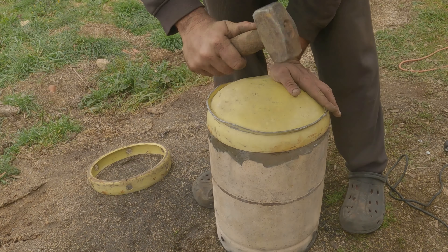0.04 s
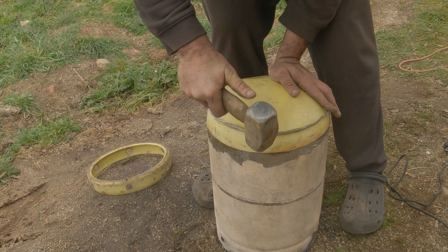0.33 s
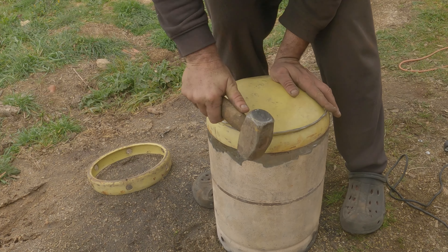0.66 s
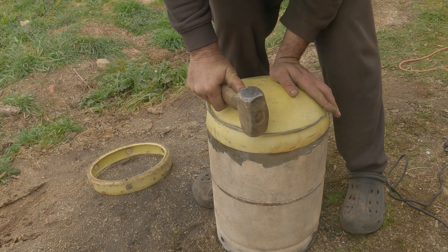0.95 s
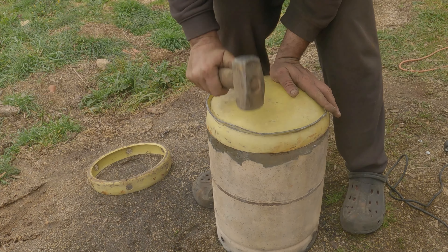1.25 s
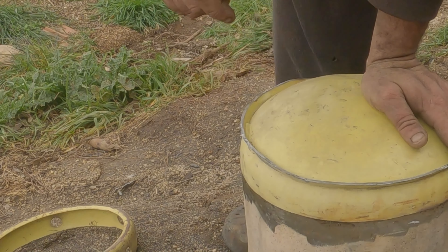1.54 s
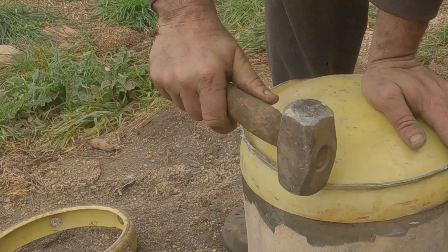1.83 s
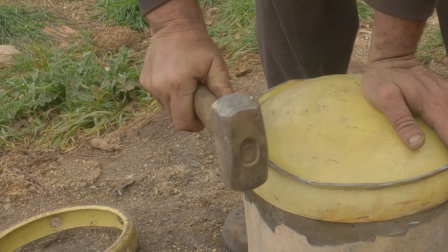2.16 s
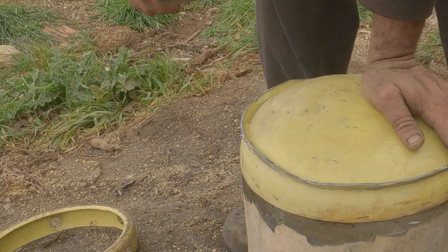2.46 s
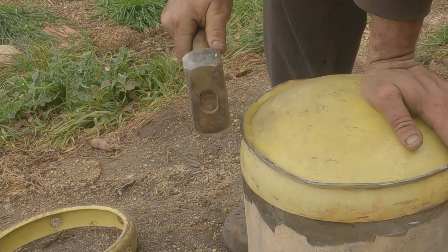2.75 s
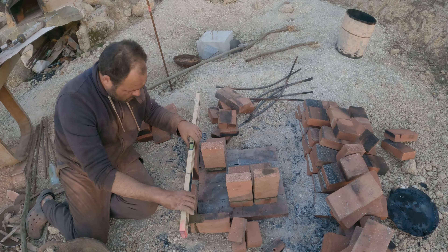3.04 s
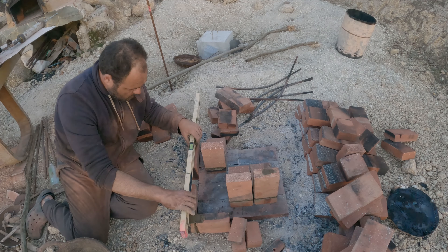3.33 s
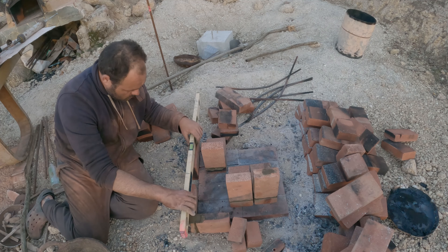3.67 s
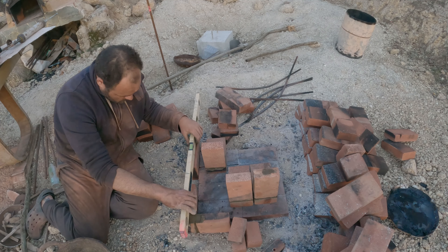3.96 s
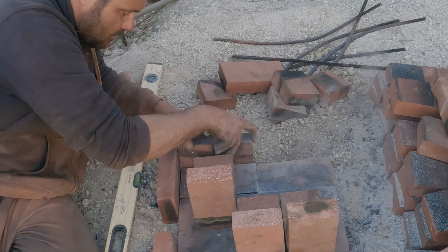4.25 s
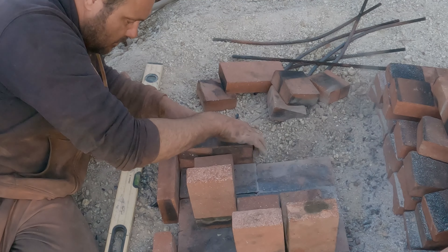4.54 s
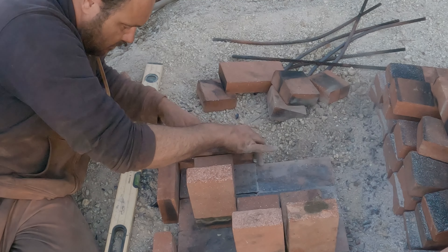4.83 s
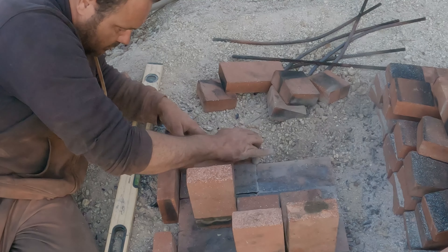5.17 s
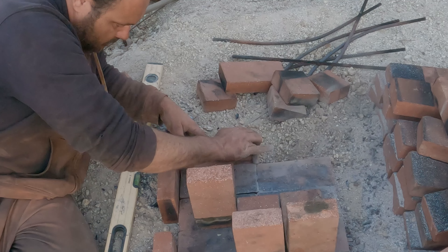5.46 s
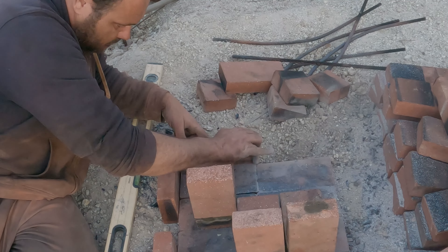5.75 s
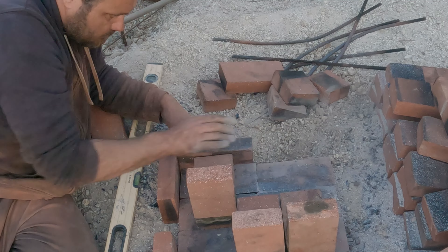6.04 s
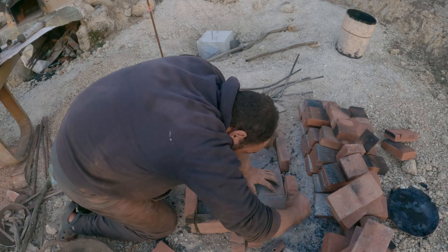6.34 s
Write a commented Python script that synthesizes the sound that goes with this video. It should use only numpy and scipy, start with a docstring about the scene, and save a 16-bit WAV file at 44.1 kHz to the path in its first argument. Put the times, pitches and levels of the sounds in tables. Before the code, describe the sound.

Close outdoor hammer blows ring on a steel gas cylinder, then bricks are quietly knocked down and slid over grit.

```python
"""A clangy steel ring, outdoors and close to the microphone: a lump hammer beats on the domed end of a gas
cylinder steadied by hand. Each blow is a crack of steel on steel, a hollow thud into the soil and the long
ring of the shell; a limiter ducks under the blow, so the ring swells back after it. At 3 s the scene
jumps to quiet bricklaying on an open site: dry bricks are nudged, set down with a knock and slid over
one another on grit, while sleeves rustle in the faint air."""
import sys
import numpy as np
from scipy import signal
from scipy.fft import rfft, irfft, next_fast_len
from scipy.io import wavfile
from scipy.ndimage import uniform_filter1d, minimum_filter1d

SR = 44100
rng = np.random.default_rng(int(sys.argv[2]) if len(sys.argv) > 2 else 0)


def inscribe(sig):
    """Save sig as 16-bit PCM at rate SR to the path in sys.argv[1].

    A 1-D sig is mono; a 2-D sig holds one channel per row.
    Samples are clipped to [-1, 1] before scaling.
    """
    pcm = np.round(np.clip(np.atleast_2d(sig).T, -1, 1) * 32767)
    wavfile.write(sys.argv[1], SR, pcm.astype(np.int16))


N = 286650
TIME = np.arange(N) / SR
RING_DROP_S, SCENE_JUMP_S = 1.323, 2.992

# hammer blows: t/s, struck spot, ring level/dB, brightness/(dB per octave), weight/dB, hardness/dB
BLOWS = [(-0.125, "crown", -0.5, 0, -5.5, 5.5), (0.2945, "crown", -0.5, -1, -8.5, 1.5),
         (0.7340, "shoulder", 1.5, 0, 6.5, -2.5), (1.0867, "shoulder", -0.5, 1, 2, 1),
         (1.4055, "rim", -4.5, 0, -10, 1), (1.8513, "rim", 3.5, -2.5, 1, -0.5),
         (2.2793, "rim", 1.5, -1, 0.5, 3), (2.7590, "side", 2, 1.5, 9.5, 8.5)]
# where the hammer lands: crown, shoulder, rim, side
SPOTS = ["crown", "shoulder", "rim", "side"]
# modes of the steel shell: f/Hz, t60/s, then level/dB for each of the SPOTS
SHELL_MODES = [(720, 1.1, -37, -34, -44, -45), (767, 1.4, -43, -34, -70, -70),
               (798, 1.3, -34, -40, -70, -42), (828, 1.4, -70, -70, -34, -46), (859, 2, -51, -51, -48, -41),
               (944, 1.8, -31, -33, -70, -34), (951, 1.8, -38, -29, -60, -33),
               (961, 1.8, -53, -42, -37, -41), (970, 1.8, -35, -38, -36, -37),
               (980, 1.5, -36, -36, -63, -58), (1178, 1.2, -41, -35, -37, -41),
               (1283, 0.9, -51, -46, -47, -38), (1311, 2, -45, -42, -70, -51),
               (1425, 1.2, -42, -29, -70, -70), (1612, 1.2, -34, -33, -66, -63),
               (1690, 0.9, -40, -46, -37, -37), (1711, 1.3, -27, -33, -70, -61),
               (1727, 1.2, -70, -46, -33, -70), (1811, 1.2, -51, -48, -36, -43),
               (1821, 1.5, -34, -42, -68, -38), (1834, 1.6, -70, -52, -31, -38),
               (1891, 0.8, -45, -40, -53, -49), (2104, 0.9, -58, -47, -47, -37),
               (2179, 0.8, -37, -40, -42, -29), (2270, 0.7, -58, -48, -58, -34),
               (2478, 0.55, -39, -41, -36, -39), (2610, 0.7, -37, -35, -27, -45),
               (3008, 0.5, -34, -36, -55, -57), (3243, 0.55, -33, -46, -42, -34),
               (3298, 0.6, -50, -49, -30, -54), (3525, 0.55, -35, -48, -47, -43),
               (3737, 0.55, -35, -48, -40, -48)]
# modes of the hollow vessel standing on soil: f/Hz, level/dB, t60/s
THUD_MODES = [(89.6, -51.5, 1.2), (100.6, -27, 0.2), (140, -16.5, 0.044), (185, -25.5, 0.066),
              (246, -15, .10), (289, -12, 0.069), (379.4, -13, 0.044), (450, -22, 0.18)]
# spectra around the cylinder: f/Hz, relative level/dB
SHIMMER = [(2000, -9.5), (2500, 2.5), (3300, 11), (4500, -0.5), (7000, -9), (8500, -25), (12000, -24)]   # the shell's crowded high modes
CLANK = [(400, -33), (620, -11), (850, -1.5), (1300, -6), (1700, -9), (2600, -24)]   # middle of the steel contact
CRACK = [(900, -24), (1600, -8), (2600, 0), (4200, -4.5), (5500, -9.5), (8000, -34.5)]   # its hard edge
FIZZ = [(3000, -23.5), (4800, 3), (7000, 1.5), (8600, -15), (12000, -20), (16000, -23)]   # its top
YARD = [(40, -19.5), (120, 2.5), (300, -4), (560, -6.5), (900, -0.5), (1600, -5), (3000, -0.5),
        (5000, -1.5), (7000, -8.5), (8700, -24.5), (11000, -29), (16000, -51)]   # scatter from the ground and nearby things
YARD_AIR = [(30, -14), (90, 0), (200, -2), (500, -3), (1500, -9), (4000, -22), (7000, -31), (9000, -42),
            (16000, -52)]   # low outdoor background
# the cylinder rocks back onto the soil: t/s, level/dB
ROCKING = [(1.937, -28.5)]

# small nudges of a brick against the spirit level: t/s, length/s, level/dB
NUDGES = [(2.989, 0.028, -49), (3.038, .05, -50.5), (3.175, .09, -55), (3.384, 0.057, -59),
          (3.509, 0.033, -58), (3.596, 0.129, -63), (4.018, 0.058, -55)]
# ways a brick makes contact: nudge, set, slide, push
CONTACTS = ["nudge", "set", "slide", "push"]
# modes of a brick: f/Hz, width/Hz, then level/dB for each of the CONTACTS
BRICK_MODES = [(1939, 17.7, -27, 9.5, -21, -34.5), (1994, 11, -25, -1, -1.5, -11),
               (2390, 23, 9, 5.5, 6.5, 5), (3480, 28, -12, -2.5, -11.5, -2), (4420, 44, -27, -2, 0.5, -21),
               (4847, 60, -10.5, -5, -4, 7), (5530, 220, -0.5, -21, -23, -10.5),
               (6430, 340, -6, -2, -1.5, -7.5), (7100, 42, -19, -1, -2.5, -14),
               (9850, 510, -23, -9.5, -11.5, -14)]
# spectra on the building site: f/Hz, relative level/dB
GRIT = [(500, -29), (1200, 5.5), (2500, 13.5), (3600, -4.5), (4500, -8), (7200, 9.5), (8200, 5),
        (9000, -24), (10500, -7), (13000, -15), (16000, -28)]   # sand between brick faces
RUMBLE = [(40, -35), (130, -42), (250, -6.5), (360, 5.5), (600, -3), (1100, -12), (2200, -9)]   # the stack under a sliding brick
SITE_AIR = [(40, -35), (100, -18.5), (170, -6.5), (280, -7.5), (520, 2), (900, -2.5), (2300, -8.5),
            (4000, -14.5), (7000, -22.5), (8800, -41.5), (10500, -35), (16000, -45)]   # outdoor background
CLOTH = [(100, -12), (220, -5), (600, -0.5), (1300, -3.5), (2400, 0), (3500, -8), (6500, -15.5),
         (8800, -37), (10500, -29), (16000, -59)]   # rubbing sleeves
# a brick slides over the stack: t/s, length/s, level/dB, weight on the bed/dB, contact
STROKES = [(4.285, 0.19, -49, 8, "set"), (4.488, 0.12, -57, -29, "slide"),
           (4.575, 0.18, -51.5, -1.5, "slide"), (4.736, .19, -50.5, 4.5, "slide"),
           (4.956, 0.138, -60, -20.5, "slide"), (5.268, 0.157, -58.5, 4.5, "set"),
           (6.348, 0.058, -46.5, 0, "push"), (6.385, 0.19, -38.5, -10.5, "push")]
# a brick grinds into its seat at the end of a stroke: middle t/s, level/dB
SEATINGS = [(4.88, -55), (5.399, -55), (6.464, -51)]
# the arms reach and draw back: middle t/s, half length/s, level/dB
ARM_MOVES = [(3.2, 0.42, -69), (4.55, 0.28, -71), (5.256, 0.42, -67), (6.026, 0.1, -60), (6.45, 0.15, -57)]
# brick knocks: t/s, level/dB, clack f/Hz (lower is softer), contact
KNOCKS = [(4.2874, -19.5, 1210, "set"), (4.3287, -12, 914, "set"), (4.8700, -34, 635, "slide"),
          (5.6000, -36.5, 1930, "set"), (5.7110, -37.5, 629.3, "set"), (6.3270, -28, 2700, "nudge")]
# modes of the stack under a knock: f/Hz, level/dB, t60/s
STACK_MODES = [(354.6, -21, 0.28), (601, -19, 0.06), (780, -11, 0.019), (1100, -21, 0.016)]
# dull bumps of a brick on its bed: t/s, level/dB, f/Hz
BUMPS = [(5.393, -50.5, 172), (5.712, -57.5, 214), (6.293, -57, 120), (6.423, -43.5, 200),
         (6.461, -43, 139)]


def from_db(db):
    """Decibels to gain."""
    return 10 ** (np.asarray(db) / 20)


def rms_one(x):
    """Scale to an rms of 1."""
    return x / np.sqrt(np.mean(x ** 2) + 1e-20)


def at_hz(points, hz):
    """Read a spectrum on a log-frequency axis."""
    f, value = np.transpose(points)
    return np.interp(np.log(np.maximum(hz, 1)), np.log(f), value)


def coloured(x, spectrum):
    """Give a steady signal a spectrum that falls away outside its ends; rms 1."""
    size = next_fast_len(len(x))
    hz = np.arange(size // 2 + 1) * SR / size
    skirts = np.minimum(hz / spectrum[0][0], 1) * np.minimum(spectrum[-1][0] / (hz + 1), 1) ** 2
    shaped = rfft(x, size) * from_db(at_hz(spectrum, hz)) * skirts
    return rms_one(irfft(shaped, size)[:len(x)])


def noise(spectrum, size):
    """Coloured noise of rms 1."""
    return coloured(rng.standard_normal(size), spectrum)


def high_pass(x, hz):
    """Roll off the bass."""
    return signal.sosfilt(signal.butter(2, hz, "high", fs=SR, output="sos"), x)


def low_pass(x, hz, order):
    """Roll off the top."""
    return signal.sosfilt(signal.butter(order, hz, fs=SR, output="sos"), x)


def decay(t, t60):
    """A fall of 60 dB in t60 seconds."""
    return np.exp(-np.log(1000) * t / t60)


def click(t):
    """A unit impulse at t = 0."""
    return 1. * (t == 0)


def ring(x, hz, t60):
    """One mode: a unit click sets a sine of height 1 ringing."""
    radius, angle = decay(1 / SR, t60), 2 * np.pi * hz / SR
    return signal.lfilter([0, np.sin(angle)], [1, -2 * radius * np.cos(angle), radius ** 2], x + 1e-18)


def flutter(t, per_s, depth_db):
    """A gain that wavers at random."""
    knots = np.arange(0, t[-1] + 1 / per_s, 1 / per_s)
    return from_db(depth_db * np.interp(t, knots, rng.normal(size=len(knots))))


def add(out, s, sound):
    """Mix a sound in from s seconds."""
    at = round(s * SR)
    part = sound[max(-at, 0):N - at]
    out[max(at, 0):max(at, 0) + len(part)] += part


def shell_ring(t, spot, db_per_octave):
    """The cylinder's strong, long modes: the struck spot decides which speak, brightness tilts them."""
    out = 0
    for hz, t60, *levels in SHELL_MODES:
        db = levels[SPOTS.index(spot)] + db_per_octave * np.log2(hz / SHELL_MODES[0][0])
        out += rng.choice([-1, 1]) * from_db(db) * ring(click(t), hz, t60)
    return out


def shimmer(t, t60_at_3k=0.56, chance_db=6.5, count=64):
    """Each blow wakes a different handful of the crowded high modes, shorter the higher they lie."""
    pitches = np.geomspace(2300, 12000, count) * np.exp(.008 * rng.normal(size=count))
    levels = at_hz(SHIMMER, pitches) + chance_db * np.clip(rng.normal(size=count), -2, 1.5)
    gains = rms_one(from_db(levels)) * rng.choice([-1, 1], count) / np.sqrt(count)
    t60s = t60_at_3k * (3000 / pitches) ** 0.1
    return sum(gain * ring(click(t), hz, t60) for gain, hz, t60 in zip(gains, pitches, t60s))


def chatter(t, spectrum, hold_s, t60, attack_s=0.0007):
    """Steel chatters on steel for an instant, then the burst collapses."""
    shape = np.minimum(t / attack_s, 1) * decay(np.maximum(t - hold_s, 0), t60)
    burst = noise(spectrum, len(t)) * shape
    return burst * np.sqrt(np.sum(shape ** 2) / np.sum(burst ** 2))


def thud(t, lag_s=0.0017):
    """The whole vessel is driven into the ground just after the contact."""
    late = np.maximum(t - lag_s, 0)
    return sum(from_db(db) * decay(late, t60) * np.sin(2 * np.pi * hz * late) * (-1) ** (k // 2)
               for k, (hz, db, t60) in enumerate(THUD_MODES))


def yard_scatter(t):
    """The ground and nearby things throw a blow back at the microphone: a splash and a duller tail."""
    splash = from_db(-17) * noise(YARD, len(t)) * decay(t, t60=0.16)
    dull = low_pass(noise(YARD, len(t)), hz=5000, order=2)
    return splash + from_db(-27.5) * dull * decay(t, t60=0.37)


def hammering():
    """Each blow replaces the last ring: heavy ones clank and lose top, hard ones crack and shimmer."""
    out = np.zeros(N)
    ends = [row[0] for row in BLOWS[1:]] + [SCENE_JUMP_S]
    for (s, spot, ring_db, db_per_octave, weight_db, hardness_db), end in zip(BLOWS, ends):
        t = np.arange(round((end - s) * SR)) / SR
        steel = from_db(ring_db) * shell_ring(t, spot, db_per_octave)
        steel += from_db(-29.5 + 0.3 * hardness_db - 0.2 * weight_db) * shimmer(t)
        clank = from_db(-5.5 + weight_db) * chatter(t, CLANK, hold_s=0.00069, t60=0.021)
        crack = from_db(-3.5 + hardness_db) * chatter(t, CRACK, hold_s=0.0017, t60=0.014)
        fizz = from_db(-6.5 - 0.42 * weight_db) * chatter(t, FIZZ, hold_s=0.00033, t60=0.015)
        body = from_db(0.97) * high_pass(thud(t), hz=69.5)
        steel *= flutter(t, per_s=70, depth_db=0.95)
        blow = steel + clank + crack + fizz + body + yard_scatter(t)
        if s < RING_DROP_S < end:   # this ring drops abruptly, 14 dB in 4 ms
            blow *= from_db(-14 * np.clip((s + t - RING_DROP_S) / .004, 0, 1))
        fade_out = np.clip((end - s - t) / .005, 0, 1)
        add(out, s, blow * fade_out)
    return out


def rocking():
    """The cylinder rocks back onto the soil with a soft thud."""
    out, t = np.zeros(N), np.arange(SR // 3) / SR
    for s, db in ROCKING:
        add(out, s, from_db(db) * high_pass(thud(t), hz=120))
    return out


def grains(size, per_s=3000, spread_db=2.5):
    """Two rough faces rubbing: dense clicks of uneven size."""
    heights = from_db(spread_db * np.minimum(rng.exponential(1, size), 4)) * rng.choice([-1, 1], size)
    return rms_one(heights * (rng.random(size) < per_s / SR))


def brick_ring(x, contact):
    """A brick's narrow resonances; how it lies decides their strengths."""
    out = 0
    for hz, width, *levels in BRICK_MODES:
        even_power = 2 * np.sqrt(np.pi * width / SR)
        t60 = np.log(1000) / (np.pi * width)
        out += from_db(levels[CONTACTS.index(contact)]) * even_power * ring(x, hz, t60)
    return out


def rub(length, contact, attack_s, release_s, weight_db):
    """One push: grit hisses, rings the sliding brick and rumbles in the stack beneath."""
    t = np.arange(round(length * SR) + SR // 10) / SR
    push = np.clip(np.minimum(t / attack_s, (length - t) / release_s), 0, 1) ** 0.56
    sand = grains(len(t)) * flutter(t, per_s=90, depth_db=3.5)   # the faces catch and slip
    hiss = from_db(-14) * coloured(sand, GRIT)
    rumble = from_db(-8 + weight_db) * coloured(sand, RUMBLE)
    return (hiss + rumble) * push + from_db(-13.5) * brick_ring(sand * push, contact)


def scrapes(nudge_rise_share=0.338, seating_s=0.05):
    """Brick on brick: nudges swell and fade at once, strokes run longer, seatings are short and heavy."""
    out = np.zeros(N)
    for s, length, db in NUDGES:
        rise_s = nudge_rise_share * length
        nudge = rub(length, "nudge", rise_s, length - rise_s, weight_db=-9.5)
        add(out, s, from_db(db) * nudge)
    for s, length, db, weight_db, contact in STROKES:
        stroke = rub(length, contact, attack_s=0.029, release_s=0.11, weight_db=weight_db)
        add(out, s, from_db(db) * stroke)
    half_s = seating_s / 2
    for s, db in SEATINGS:
        seating = rub(seating_s, "slide", half_s, half_s, weight_db=15)
        add(out, s - half_s, from_db(db) * seating)
    return high_pass(out, hz=134)


def sleeves(t):
    """Cloth rubs on cloth, swelling with each move of the arms."""
    swell = sum(from_db(db) * np.exp(-((t - s) / half_s) ** 2 / 2) for s, half_s, db in ARM_MOVES)
    return swell * coloured(grains(len(t)), CLOTH)


def with_bounces(rows, above_db=-17, first_gap_s=0.0153):
    """Every knock; a loud one bounces twice, each time sooner, weaker and softer."""
    for s, db, clack_hz, contact in rows:
        yield s, db, clack_hz, contact
        if db > above_db:
            for k in range(2):
                s += first_gap_s * 0.4 ** k
                db -= 8.5
                clack_hz *= 0.85
                yield s, db, clack_hz, contact


def knocks():
    """One dull swing of pressure and a splash of grit as a brick lands; stack and brick ring on."""
    out, t = np.zeros(N), np.arange(SR // 4) / SR
    tap = click(t)
    for s, db, clack_hz, contact in with_bounces(KNOCKS):
        clack = 0.62 * ring(tap, clack_hz, t60=7.4 / clack_hz)
        weight = min(900 / clack_hz, 1) ** 2   # light, hard taps hardly move the stack
        stack = weight * sum(from_db(level) * ring(tap, hz, t60) for hz, level, t60 in STACK_MODES)
        splash = from_db(-21) * noise(GRIT, len(t)) * decay(t, t60=0.0088)
        knock = clack + stack + splash + from_db(-11) * brick_ring(tap, contact)
        pole = np.exp(-2 * np.pi * (2500 + clack_hz) / SR)   # low-pass: sand cushions the contact
        cushioned = signal.lfilter([1 - pole], [1, -pole], knock)
        add(out, s, from_db(db) * high_pass(cushioned, hz=260))
    return out


def bumps():
    """A brick finds its seat on the bed: one low, quickly damped mode."""
    out, t = np.zeros(N), np.arange(SR // 3) / SR
    for s, db, hz in BUMPS:
        add(out, s, from_db(db) * high_pass(ring(click(t), hz, t60=0.13), hz=110))
    return out


def scene():
    """One microphone: the cylinder in the yard, then the bricks on site, each over its own outdoor air."""
    jump = round(SCENE_JUMP_S * SR)
    yard_air = from_db(-67) * noise(YARD_AIR, jump)
    site_air = from_db(-67.5) * noise(SITE_AIR, N - jump)
    site_background = high_pass(site_air + sleeves(TIME[jump:]), hz=128)
    background = np.concatenate([yard_air, site_background])
    # the brick scrapes and knocks are dulled above 11.6 kHz
    bricks = low_pass(scrapes() + knocks(), hz=11600, order=4)
    return (hammering() + rocking() + bricks + bumps() + background)[None]


def limiter(x, threshold_db=-0.87, release_db_per_s=75, ahead_s=0.0027):
    """The gain dives just ahead of a peak and climbs back steadily."""
    over_db = np.maximum(20 * np.log10(np.abs(x) + 1e-9) - threshold_db, 0)
    climb_db = release_db_per_s * TIME
    duck_db = np.maximum.accumulate(over_db + climb_db, axis=-1) - climb_db
    ahead = round(ahead_s * SR)
    gain_db = uniform_filter1d(minimum_filter1d(-duck_db, 2 * ahead + 1), ahead)
    return x * from_db(gain_db)


def record(dry, ceiling=0.64, stopband_hz=17000):
    """Behind the microphone: a limiter, rounded peaks and a steep top cut."""
    rounded = ceiling * np.tanh(limiter(dry) / ceiling)
    top_cut = signal.cheby2(16, 70, stopband_hz, fs=SR, output="sos")
    return signal.sosfilt(top_cut, rounded)


dry = scene()
out = record(dry)
inscribe(out)
```